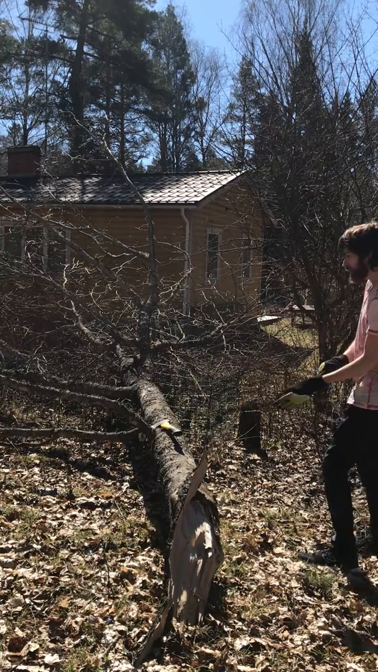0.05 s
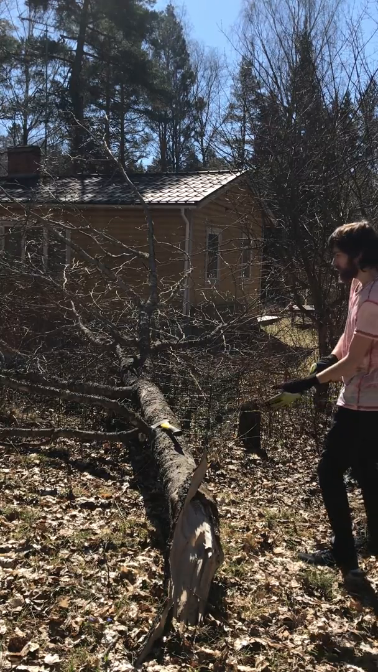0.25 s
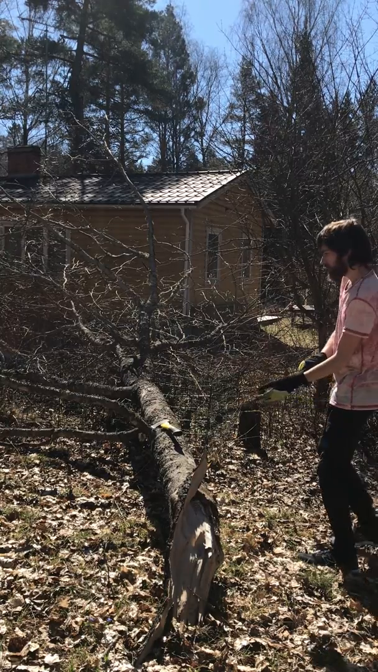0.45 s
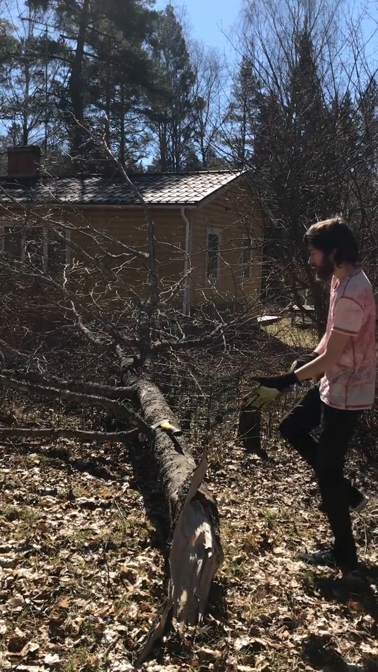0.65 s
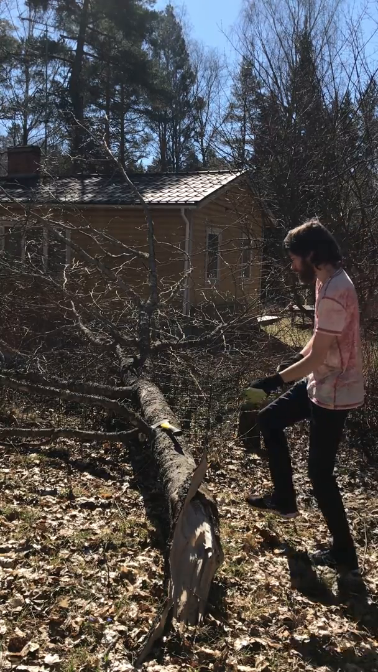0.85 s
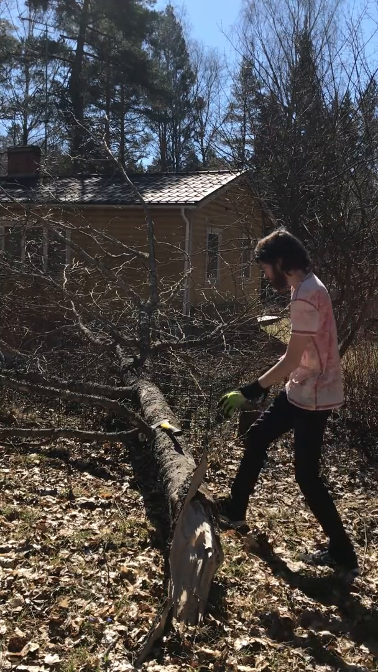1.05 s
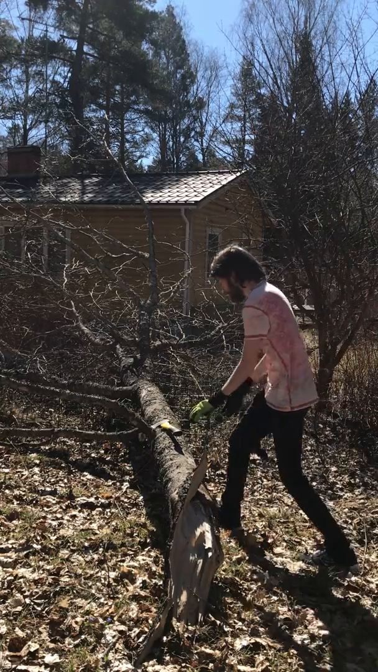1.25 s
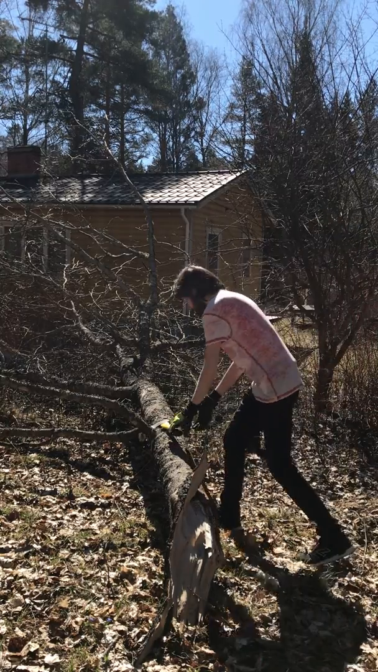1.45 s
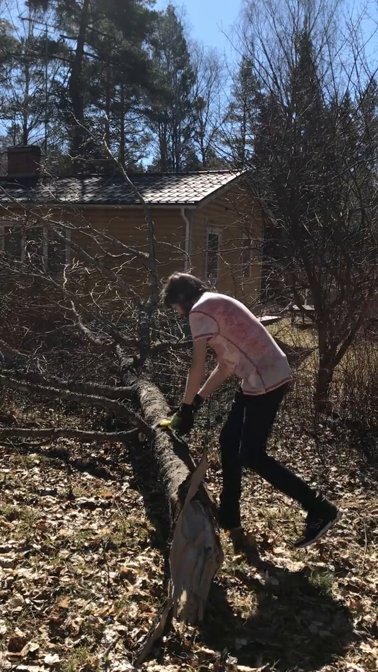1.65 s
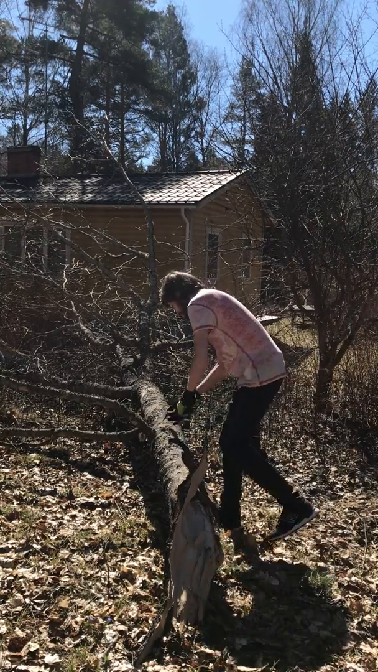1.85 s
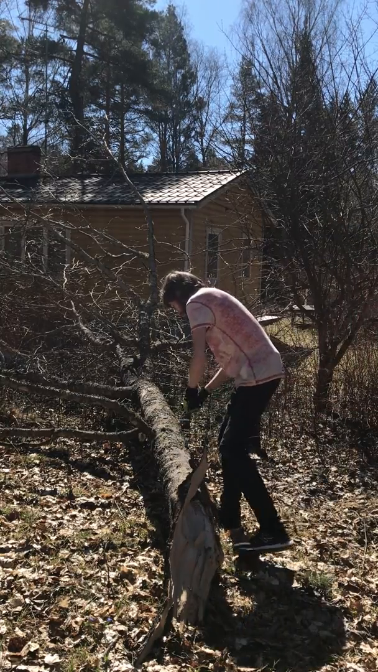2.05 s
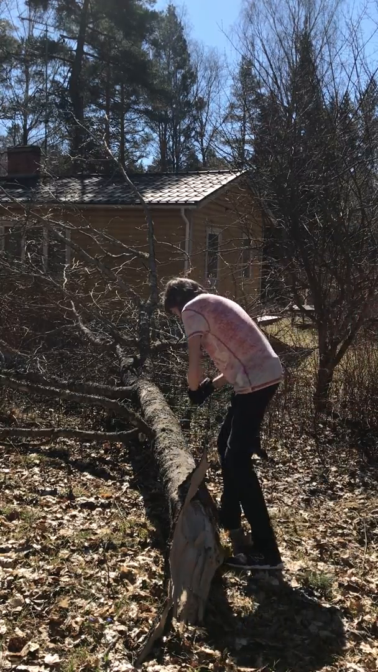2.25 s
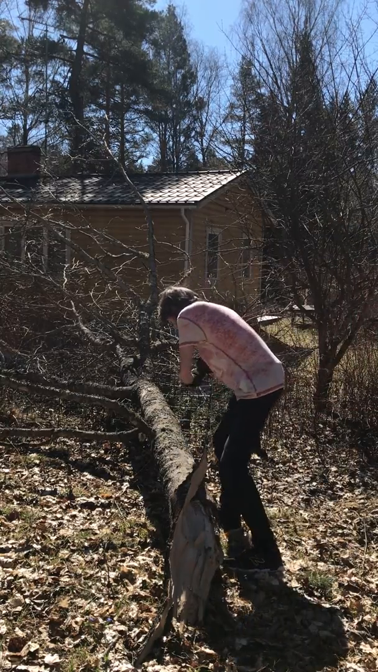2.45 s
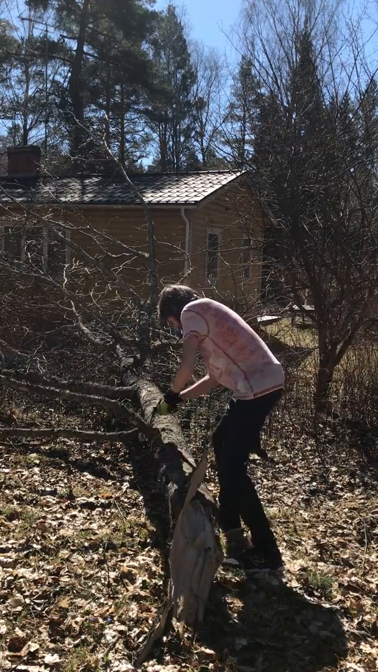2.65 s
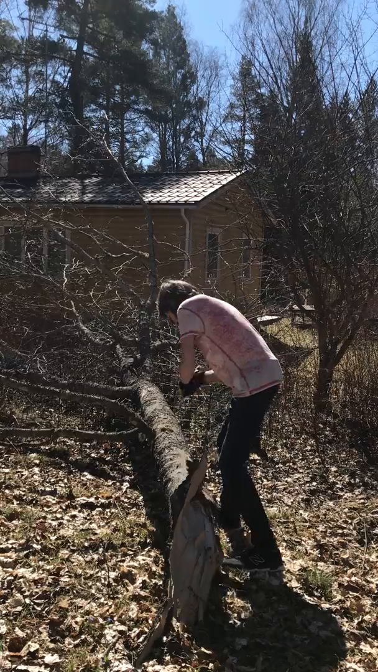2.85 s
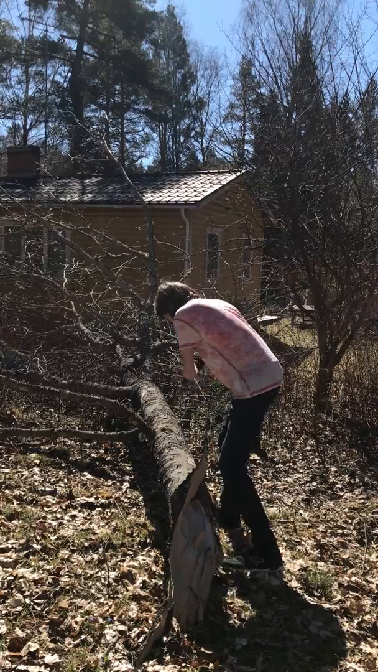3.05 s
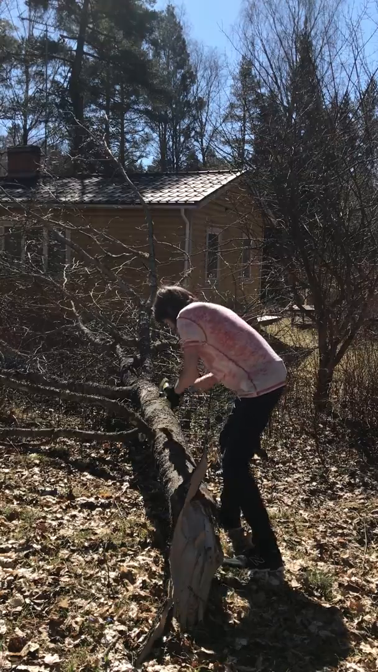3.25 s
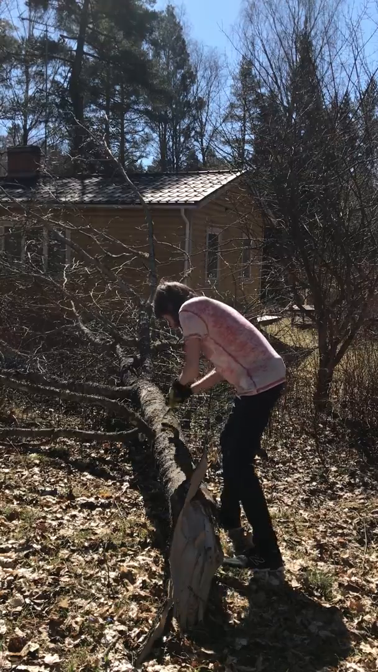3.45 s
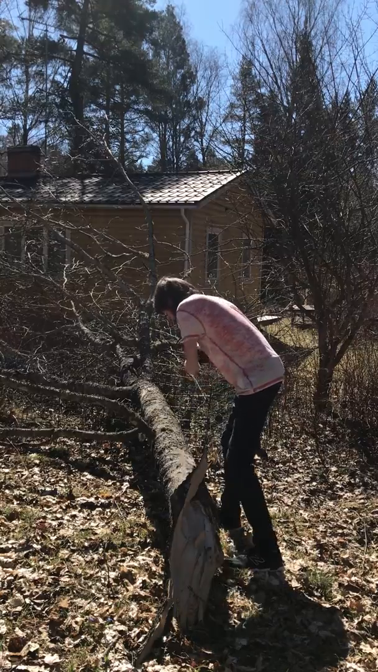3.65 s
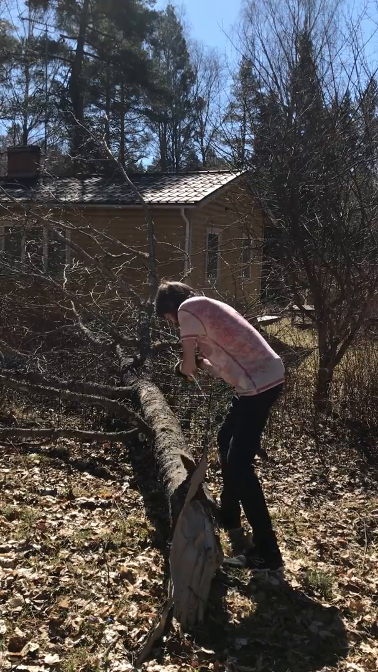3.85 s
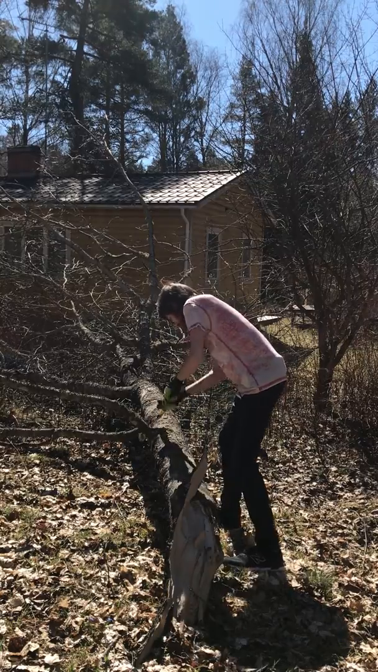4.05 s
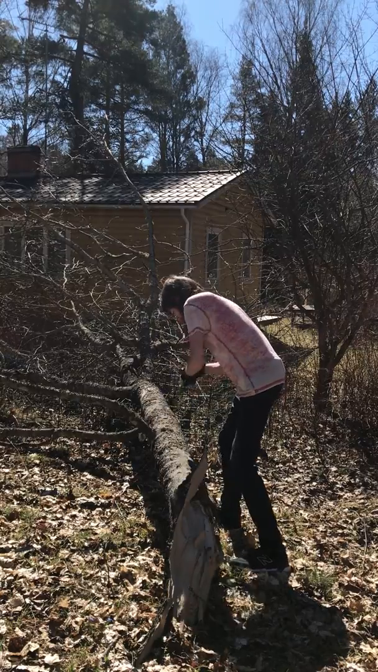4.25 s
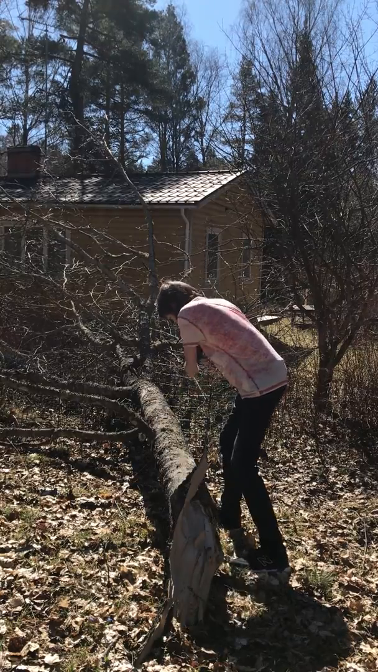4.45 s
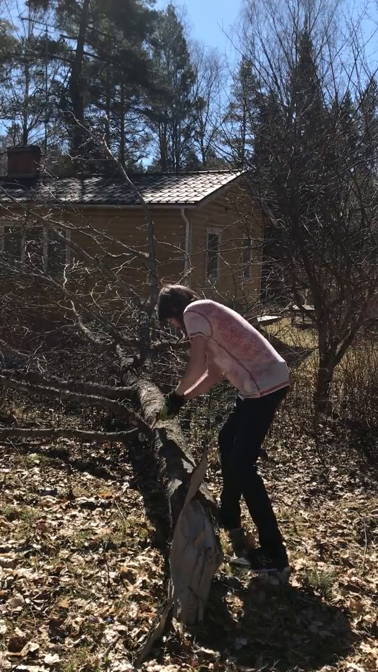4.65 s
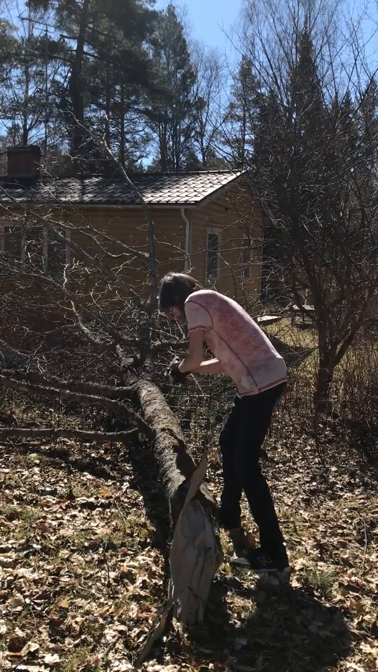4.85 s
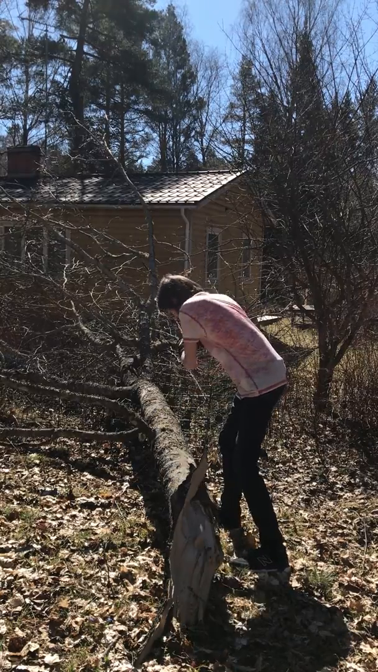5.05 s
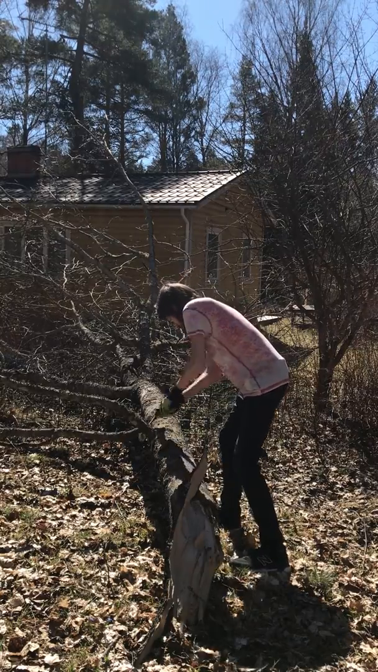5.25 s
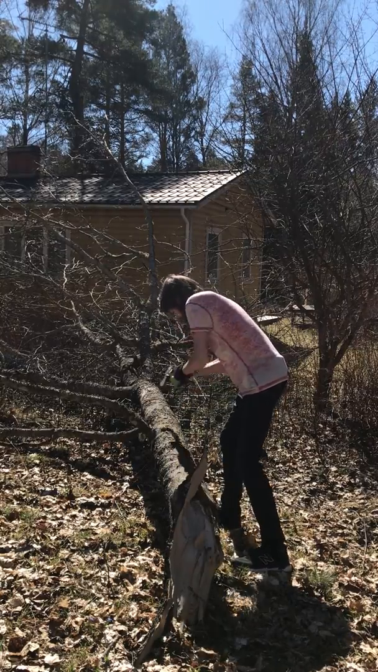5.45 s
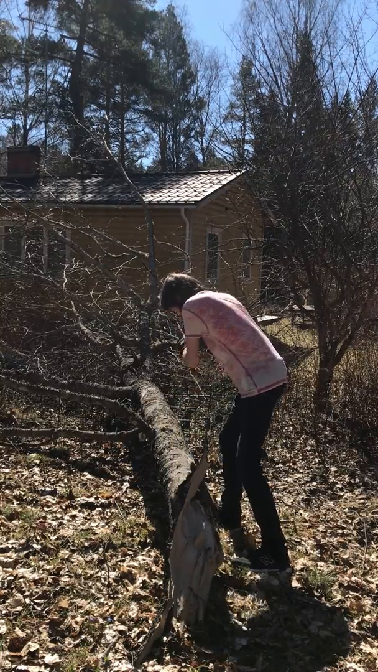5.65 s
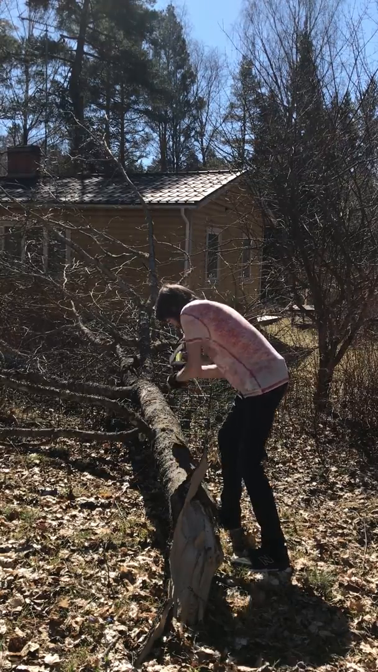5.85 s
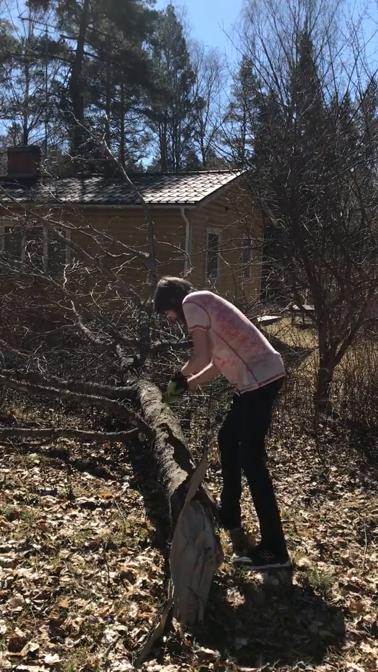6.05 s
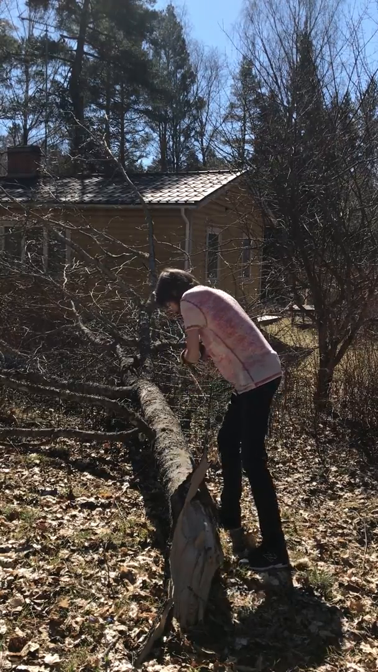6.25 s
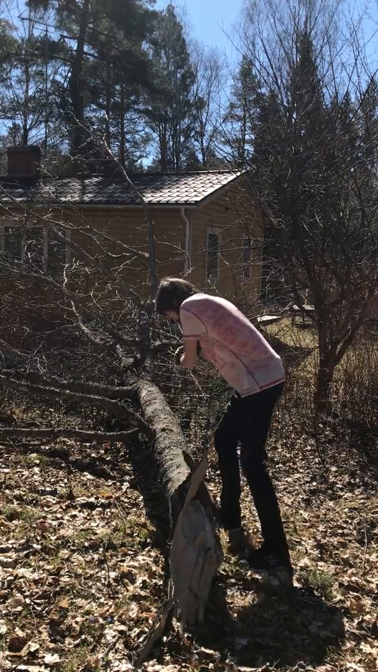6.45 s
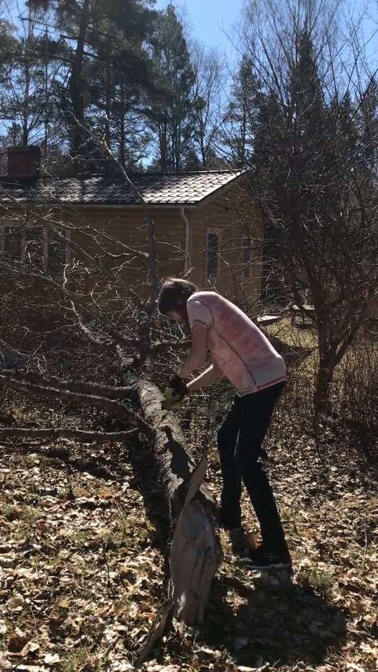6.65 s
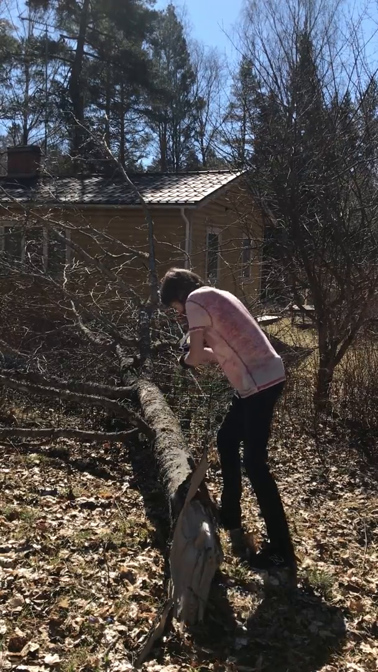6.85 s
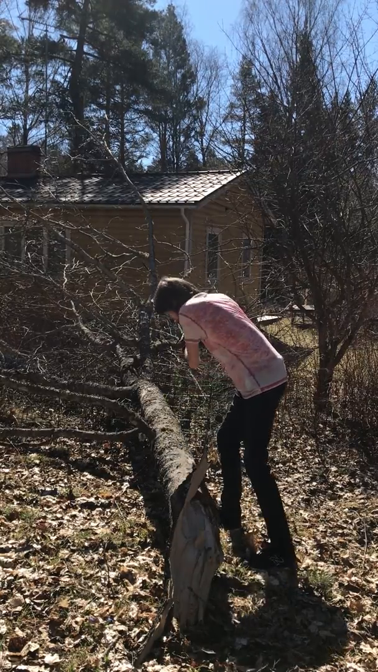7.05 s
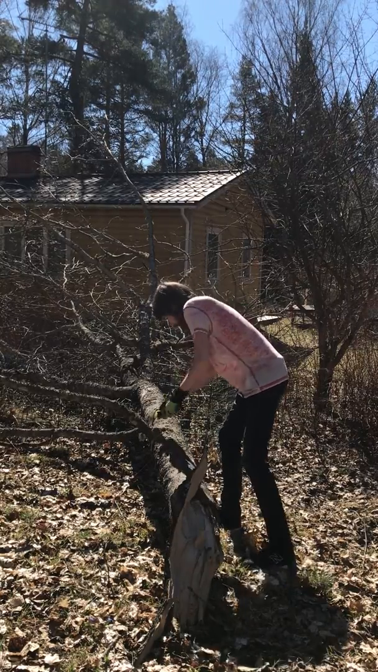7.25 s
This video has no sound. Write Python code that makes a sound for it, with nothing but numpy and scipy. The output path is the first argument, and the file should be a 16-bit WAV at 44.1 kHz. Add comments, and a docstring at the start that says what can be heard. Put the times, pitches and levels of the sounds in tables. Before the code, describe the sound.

Dry leaf rustle and small twig ticks lead into seven steady, loud hatchet blows on a log, echoing briefly around a quiet yard.

```python
"""Dry leaves rustle and twigs tick as a man steps up to a felled trunk; then he chops it seven times.
Each blow is a short noisy bite of the hatchet blade plus fading tones: the hollow knock of the log and a chip.
Delayed copies answer from ground, house and trees, and fading noise stands for the forest edge.
Leaves are noise and tiny clicks, low thuds are sinking tones, and far birds are warbled tones.
Light wind at the microphone and a distant hush are shaped noise."""
import sys
import numpy as np
from scipy import signal
from scipy.fft import rfft, irfft, next_fast_len
from scipy.io import wavfile
from scipy.ndimage import map_coordinates

SR = 44100
rng = np.random.default_rng(int(sys.argv[2]) if len(sys.argv) > 2 else 0)


def put_to_file(sound):
    """Save the sound as 16-bit audio at rate SR, in the file named by the first command-line argument."""
    columns = np.atleast_2d(sound).T  # one column per channel
    safe = np.clip(columns, -1, 1)
    whole_steps = np.round(safe * 32767)
    wavfile.write(sys.argv[1], SR, whole_steps.astype(np.int16))


N = 322371  # length in samples, about 7.3 s

# delays of the two nearest reflections (s)
GROUND_S, SHED_S = 0.0059, 0.0174
# tone colour that branches give to scattered sound: pitch_hz [Hz], level_db [dB]
BRANCH_TONE = [(100, 19.5), (350, -5.5), (520, -25.5), (860, -7), (1200, -11.5), (2000, 5), (6000, 2),
               (14000, -8)]
# tone colour of the leaf sounds, with deep dips near 7.4 and 10.4 kHz: pitch_hz [Hz], relative level_db [dB per
# Hz]
LEAF_TONE = [(300, -9.5), (1000, -4.5), (2200, -8.5), (3500, -5), (6100, -3.5), (7400, -11), (8800, -1.5),
             (10400, -12), (12300, -4), (14200, -4), (16000, 0)]


def amp(db):
    """Gain of a level in dB."""
    return 10 ** (np.asarray(db) / 20)


def unit(x):
    """Scale x to an rms (average strength) of 1."""
    return x / np.sqrt(np.mean(x ** 2) + 1e-20)


def along(points, hz):
    """Read (Hz, value) points at any pitch, on a log pitch axis."""
    point_hz, value = np.transpose(points)
    return np.interp(np.log(hz + 1), np.log(point_hz + 1), value)


def curve(rows):
    """Turn (s, value) rows into one value per sample."""
    return np.interp(np.arange(N) / SR, *np.transpose(rows))


def wobble(rate):
    """A smooth random curve with `rate` random points a second."""
    points = rng.standard_normal(int(N * rate / SR) + 4)
    return map_coordinates(points, [np.arange(N) * rate / SR])


def filtered(x, response):
    """Multiply the spectrum of x by a response that depends on frequency."""
    size = next_fast_len(len(x) + SR // 2)  # spare room, so the end does not wrap to the start
    spectrum = rfft(x, size) * response(np.fft.rfftfreq(size, 1 / SR))
    return irfft(spectrum, size)[:len(x)]


def coloured(x, spectrum):
    """Shape x with a (Hz, dB) spectrum."""
    return filtered(x, lambda hz: amp(along(spectrum, hz)))


def noise(spectrum, size):
    """Noise of rms 1 with the given spectrum."""
    return unit(coloured(rng.standard_normal(size), spectrum))


def add(track, s, sound):
    """Mix a sound into the track from time s."""
    start = max(round(s * SR), 0)
    track[start:start + len(sound)] += sound[:max(N - start, 0)]


def hatchet(bass_hz=100):
    """Each blow rings the log and a chip, splits fibres and cracks at the blade."""
    # hatchet blows: start_s [s], knock_db [dB], ring_db [dB], split_db [dB], crack_db [dB],
    # knock tilt_db [dB per octave], chip_hz [Hz], chip_db [dB]
    blows = [(2.7316, -7, -12, -20.5, -26, 3, 1500, -25),
             (3.4187, -11.5, -13, -29.5, -35.5, -13, 2980, -30.5),
             (4.078, -6.5, -8, -20.5, -22, -5.5, 1937, -20), (4.7574, -10, -6.5, -21, -23, -7.5, 2827, -27),
             (5.3796, -7.5, -9, -16.5, -21, 6, 2570, -25), (6.0450, -8.5, -12.5, -18, -35, -7, 1445, -16),
             (6.7002, -6.5, -8, -18, -20.5, 7, 1596, -12)]
    # fibres splitting in the cut: pitch_hz [Hz], relative level_db [dB per Hz]
    fibre_tone = [(150, -26), (380, -23), (520, -46.5), (700, 8.5), (1200, 2), (2000, -2.5), (2400, -7.5),
                  (3000, -9.5), (4500, -10), (5400, -21.5), (16000, -66)]
    # crack of the blade: pitch_hz [Hz], relative level_db [dB per Hz]
    crack_tone = [(1500, -21.5), (3000, -18), (4400, -7), (5800, 8), (7200, 1.5), (9000, 1), (10500, 3),
                  (12200, 1), (14200, 7), (16000, 3.5)]
    track, t = np.zeros(N), np.arange(SR) / SR
    # a slim trunk moves little air in the deep bass
    radiation = signal.butter(2, bass_hz, "highpass", fs=SR, output="sos")
    for s, knock_db, ring_db, split_db, crack_db, tilt_db, chip_hz, chip_db in blows:
        ring = signal.sosfilt(radiation, log_ring(t, knock_db, ring_db, tilt_db))
        chip_ring = amp(chip_db) * chip(t, chip_hz)
        split_bite = bite(t, start=0.0004, length=0.004, t60=0.053, after_db=0.5)
        split = amp(split_db) * noise(fibre_tone, size=SR) * split_bite
        crack_bite = bite(t, start=0.0022, length=0.0026, t60=0.15, after_db=-13.5)
        crack = amp(crack_db) * noise(crack_tone, size=SR) * crack_bite
        add(track, s, yard(ring + chip_ring + split + crack))
    return track


def log_ring(t, knock_db, ring_db, tilt_db, attack=0.0022):
    """The trunk's own tones (modes); every blow lands on a new spot and weights them anew."""
    # pitches of the trunk's modes: pitch_hz [Hz]
    mode_hz = [166, 238, 290, 350, 466, 606, 678, 755, 860, 915, 1008, 1135, 1510, 1720, 1937, 2850, 4330]
    # strength and fading of each mode: level_db [dB], t60_s, time to fall by 60 dB [s]
    mode_rows = [(-14, 0.081), (-16.5, 0.072), (4, 0.036), (-1, 0.054), (-17, 0.1), (-19.5, 0.15),
                 (-10, 0.075), (-15, 0.14), (-1, 0.063), (6, 0.034), (-2, 0.054), (-3, 0.03), (-6.5, 0.014),
                 (-16.5, 0.059), (-12, 0.022), (-22, 0.034), (-14, 0.015)]
    hz = np.array(mode_hz)[:, None]
    db, t60 = np.transpose(mode_rows)[:, :, None]
    # random spread of each mode: 1.2 dB in level, 0.4 percent in pitch
    chance = rng.standard_normal((len(mode_rows), 2, 1)) * [[1.2], [0.004]]
    hollow_db = knock_db + tilt_db * np.log2(np.maximum(hz, 270) / 310)
    # low modes make the hollow knock, high ones the woody ring
    level = db + np.where(hz < 550, hollow_db, ring_db) + chance[:, 0]
    modes = amp(level - 60 * t / t60) * np.sin(2 * np.pi * hz * (1 + chance[:, 1]) * t)
    return modes.sum(axis=0) * (1 - np.exp(-(t / attack) ** 2))


def chip(t, hz, t60=0.032, attack=0.002):
    """The chip that the blade levers loose rings briefly at a pitch of its own."""
    return np.sin(2 * np.pi * hz * t) * amp(-60 * t / t60) * (1 - np.exp(-t / attack))


def bite(t, start, length, t60, after_db):
    """Loudness of the blade sinking in: a few ms at full force, then fibres giving way."""
    sinking = np.exp(-((t - start - length / 2) / (length / 2)) ** 4)
    giving_way = amp(after_db - 60 * t / t60) * (1 - np.exp(-(t / length) ** 2))
    return sinking + giving_way


def yard(x, branch_db=-14, forest_db=-29):
    """One blow with its distinct echoes and the scatter from branches and forest."""
    # echoes from ground, house and trees: delay_s [s], level_db [dB], dull_hz, duller above [Hz]
    echo_rows = [(GROUND_S, -14, 3050), (SHED_S, -17.5, 2500), (0.048, -28, 13000), (0.068, -40.5, 5600),
                 (.107, -35.5, 6600), (0.11, -39.5, 2900)]
    # fading of the branch scatter: pitch_hz [Hz], t60_s [s]
    branch_t60 = [(150, 0.2678), (900, 0.5349), (3000, 0.2), (12000, 0.67)]
    # fading of the forest-edge scatter: pitch_hz [Hz], t60_s [s]
    forest_t60 = [(150, .7), (1000, 1.92), (3000, 1.13), (10000, 1.3)]
    # tone colour of the forest-edge scatter: pitch_hz [Hz], level_db [dB]
    forest_tone = [(150, -6.5), (520, -4), (860, -3), (1200, 1.5), (1500, 7), (3000, 12.5), (6000, -9),
                   (14000, -6)]

    def echoes(hz):
        """Each echo is a delayed, quieter and duller copy."""
        return sum(amp(db) * np.exp(-2j * np.pi * hz * delay) / (1 + 1j * hz / dull_hz)
                   for delay, db, dull_hz in echo_rows)

    tail = amp(branch_db) * scatter(branch_t60, BRANCH_TONE, build=0.021)
    tail = tail + amp(forest_db) * scatter(forest_t60, forest_tone, build=0.019)
    return x + filtered(x, echoes) + diffused(x, tail)


def scatter(t60, colour, build):
    """A noise tail that builds up and fades at its own speed at each pitch, then gets its tone colour."""
    hz, t, bands = signal.stft(rng.standard_normal(SR), SR, nperseg=256)
    fading = amp(-60 * t / along(t60, hz)[:, None])
    tail = signal.istft(bands * fading, SR, nperseg=256)[1][:SR]
    tail = tail * (1 - np.exp(-(np.arange(len(tail)) / SR / build) ** 2))
    return coloured(tail / np.linalg.norm(tail), colour)


def diffused(x, tail, width=0.079):
    """Scatter from countless paths keeps only the broad colour of x."""
    power = np.abs(rfft(x, len(tail))) ** 2
    bins, total = np.arange(len(power)), np.cumsum(power)
    # average the power over a span that widens with pitch
    reach = width * bins + 1
    above, below = np.interp(bins + reach, bins, total), np.interp(bins - reach, bins, total)
    broad = (above - below) / (2 * reach)
    return filtered(tail, lambda hz: np.sqrt(np.abs(np.interp(hz * len(tail) / SR, bins, broad))))


def leaves(flutter_db=2.5, top_hz=9500):
    """Light treading crackles; under a harder drag the fractures merge into a hiss."""
    # a foot presses or drags through leaves: start_s [s], length_s [s], hiss_db [dB],
    # top_db, treble relative to the hiss [dB], crackle_db [dB]
    footfalls = [(0, 0.028, -38, -11, -49), (0.165, 0.098, -54, -3, -55.5), (0.346, 0.23, -53, -9, -63.5),
                 (0.62, 0.08, -61, -4, -59), (0.91, 0.26, -63.5, 0, -63), (1.251, 0.037, -48.5, -10, -66),
                 (1.352, 0.292, -57.5, -5, -65.5), (2.212, 0.08, -43.5, 3, -61),
                 (2.335, 0.071, -51.5, -1, -59), (2.503, .06, -50, -5, -56.5), (2.86, 0.32, -62.5, -2, -72),
                 (3.62, .32, -72, -9, -74), (4.25, .11, -47, -4, -71), (4.41, 0.18, -61.5, -6, -63),
                 (4.942, 0.2, -61.5, -3, -73), (5.537, 0.19, -55.5, -7, -73), (6.114, .37, -50.5, -6, -63),
                 (6.788, 0.21, -52.5, -9, -60.5), (7.036, 0.42, -67, -17, -68)]
    stir_hiss_db, stir_crackle_db = -72, -70.5  # leaves stirring between the footfalls
    hiss = noise(LEAF_TONE, size=N)
    top = filtered(hiss, lambda hz: 1 / (1 + (top_hz / (hz + 1)) ** 6))
    low_gain, top_gain, crackle_gain = amp(stir_hiss_db), amp(stir_hiss_db), amp(stir_crackle_db)
    for s, length, hiss_db, top_db, crackle_db in footfalls:
        weight = pressure(s, length)
        low_gain = np.maximum(low_gain, amp(hiss_db) * weight)
        top_gain = np.maximum(top_gain, amp(hiss_db + top_db) * weight)
        crackle_gain = np.maximum(crackle_gain, amp(crackle_db) * weight)
    rustle = low_gain * (hiss - top) + top_gain * top
    return amp(flutter_db * wobble(45)) * rustle + crackle_gain * crackles()


def pressure(start, length, press_s=0.025, settle_s=0.04):
    """Leaves give way as the weight of a footfall comes on, and settle when it lifts."""
    t = np.arange(N) / SR
    coming_on = np.minimum(t - start, 0) / press_s
    lifting = np.maximum(t - start - length, 0) / settle_s
    return np.exp(coming_on - lifting)


def crackles(rate=450, hz=7500, spread=0.9, spread_db=9.0):
    """Tiny fractures of dry leaves, `rate` a second, each dying within a cycle or two."""
    chance = rng.standard_normal((int(rate * N / SR), 2)).clip(-2, 2)
    starts = rng.integers(0, N, (len(chance), 1))
    n = np.arange(SR // 300)
    pitch = np.minimum(hz * np.exp(spread * chance[:, :1]), SR / 3)
    turns = pitch * n / SR  # cycles since the start of each fracture
    strength = np.sqrt(pitch) * amp(spread_db * chance[:, 1:])
    grains = strength * np.exp(-turns) * np.sin(2 * np.pi * turns)
    clicks = np.bincount((starts + n).ravel(), grains.ravel(), minlength=N)[:N]
    return unit(coloured(clicks, LEAF_TONE))


def twigs(snap_t60=0.014, settle_t60=0.15, settle_db=-15, body_db=-4, fizz_db=-6):
    """Each larger twig gives a sharp snap of noise, then the leaves around it settle."""
    # twigs snapping: start_s [s], level_db [dB], top_db, treble relative to the level [dB]
    snaps = [(0.021, -38, -25), (0.2132, -43, 4), (0.2268, -43, -17), (0.2405, -36.5, -22),
             (0.6558, -43.5, -17), (0.7052, -45.5, -18), (0.7332, -42.5, -22), (0.861, -43.5, -19),
             (0.9305, -42, -25), (0.964, -47, -21), (0.9816, -39.5, -11), (1.0029, -42.5, -13),
             (1.164, -49.5, 2), (1.203, -46, -21), (1.868, -50, -2), (3.2475, -50, 10.5), (3.551, -49, 9),
             (3.5663, -50, 8), (3.8731, -46.5, -8), (4.3045, -34, -14), (4.6966, -48, -19.5),
             (5.2116, -43.5, -6), (5.7824, -38, -14), (5.7889, -39, -18), (6.4606, -42, -23),
             (6.5401, -40.5, -24), (6.611, -44.5, 0)]
    # tone colour of a snap: pitch_hz [Hz], relative level_db [dB per Hz]
    snap_tone = [(800, -5), (2200, 0), (4000, -0.5), (6000, 3.5), (7400, -4), (8700, 1.5), (10400, -12),
                 (16000, -6)]
    fizz_tone = [(5000, -32.0), (8800, -16), (10400, -3), (13000, 2), (16000, -17)]  # (Hz, dB)
    track, t = np.zeros(N), np.arange(SR // 8) / SR
    fading = amp(-60 * t / snap_t60) + amp(settle_db - 60 * t / settle_t60)
    for s, db, top_db in snaps:
        body = amp(body_db) * noise(snap_tone, size=len(t))
        fizz = amp(top_db + fizz_db) * noise(fizz_tone, size=len(t))
        add(track, s, amp(db) * (body + fizz) * fading)
    return track


def thuds(sag=0.12, scuff_db=-10):
    """Soft low pushes of steps and air: a tone sinking in pitch, with a little low noise."""
    # low thuds: start_s [s], level_db [dB], pitch_hz that the tone sinks to [Hz], length_s [s]
    pushes = [(0.851, -34.5, 100, 0.012), (1.059, -38.5, 76.5, 0.012), (1.259, -40.5, 58.6, 0.045),
              (1.326, -36.5, 68.5, 0.055), (1.371, -33.5, 60, 0.063), (3.356, -35.5, 83, 0.019),
              (4.831, -37.5, 68, 0.046), (7.279, -34.5, 62, 0.043)]
    scuff_tone = [(40, 0), (170, 0), (300, -20), (900, -36), (3000, -80)]  # (Hz, dB)
    track, t = np.zeros(N), np.arange(SR // 4) / SR
    for s, db, hz, length in pushes:
        u = 3 * t / length  # the swell is fullest at u = 1, a third of the way in
        phase = 2 * np.pi * np.cumsum(hz * (1 + sag * np.exp(-u))) / SR
        scuff = amp(scuff_db) * noise(scuff_tone, size=len(t))
        swell = u * np.exp((1 - u ** 2) / 2)
        add(track, s, amp(db) * swell * (np.sin(phase) + scuff))
    return track


def birds(syllable_db=3):
    """Thin, fast warbled notes, blurred by the trees they come through."""
    # far birds twittering: start_s [s], end_s [s], pitch_hz [Hz], level_db before the blur [dB]
    notes = [(3.29, 3.413, 5860, -65), (3.613, 3.723, 4400, -73), (3.754, 3.957, 3880, -68),
             (3.966, 4.025, 4520, -63.5), (7.133, 7.155, 5800, -60), (7.189, 7.32, 5600, -66.5)]
    song = np.zeros(N)
    for start, end, hz, db in notes:
        size = int(max(end - start, 0.01) * SR)
        warble = 1 + 0.12 * wobble(160)[:size]
        note = np.sqrt(np.hanning(size)) * np.sin(2 * np.pi * np.cumsum(hz * warble) / SR)
        add(song, start, amp(db + syllable_db * wobble(48)[:size]) * note)
    trees = scatter([(4000, 0.12)], BRANCH_TONE, build=0.003)
    return signal.fftconvolve(song, trees)[:N]


def outdoors(lumps_db=3, gusts_db=1, air_db=-61.5):
    """A steady distant hush, and wind that buffets the microphone in slow gusts and quick lumps."""
    # strength of the light breeze: time_s [s], buffet level_db before gusts and lumps [dB]
    breeze = [(0, -65.5), (1.25, -56.5), (1.9, -69), (2.6, -64.5), (3.6, -56), (5.9, -63), (6.55, -50.5),
              (7.3, -54.5)]
    # tone colour of the wind buffeting: pitch_hz [Hz], relative level_db [dB per Hz]
    buffet_tone = [(20, -37), (45, 3.5), (65, -1), (105, -10), (200, -23.5), (400, -43)]
    # tone colour of the distant hush: pitch_hz [Hz], relative level_db [dB per Hz]
    hush_tone = [(59, -38), (100, -7), (271, -4), (398, -5.5), (433, -13.5), (872, -7.5), (1170, -14.5),
                 (1650, -9), (1810, -19.5), (1925, -6), (2020, -34), (2270, -25), (5420, -29.5),
                 (6990, -35), (13200, -42), (16000, -39.5)]
    wind_db = curve(breeze) + gusts_db * wobble(2.8) + lumps_db * wobble(22)
    return amp(wind_db) * noise(buffet_tone, size=N) + amp(air_db) * noise(hush_tone, size=N)


def scene():
    """Everything heard in the yard, as one channel."""
    return (hatchet() + leaves() + twigs() + thuds() + birds() + outdoors())[None]


def record(dry, ceiling=0.72, top_hz=15950):
    """The recorder rounds off the highest peaks and ends steeply at its band limit."""
    rounded = dry[0] / (1 + np.abs(dry[0] / ceiling) ** 6) ** (1 / 6)
    return filtered(rounded, lambda hz: 1 / np.sqrt(1 + (hz / top_hz) ** 160))[None]


dry = scene()
out = record(dry)
put_to_file(out)
```